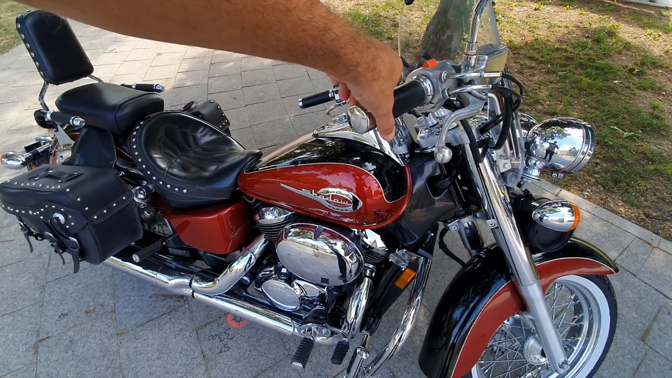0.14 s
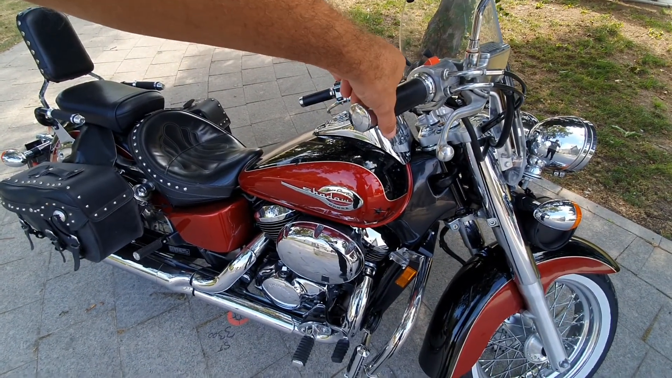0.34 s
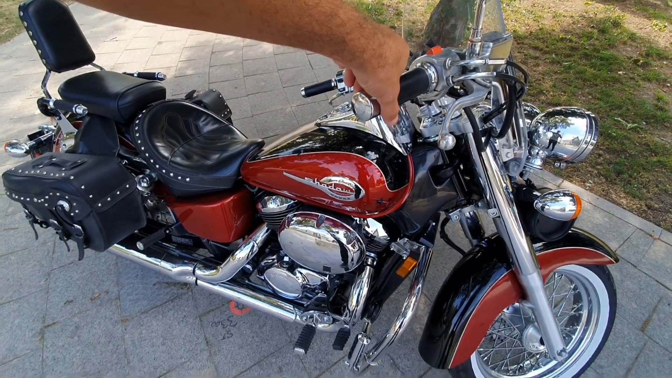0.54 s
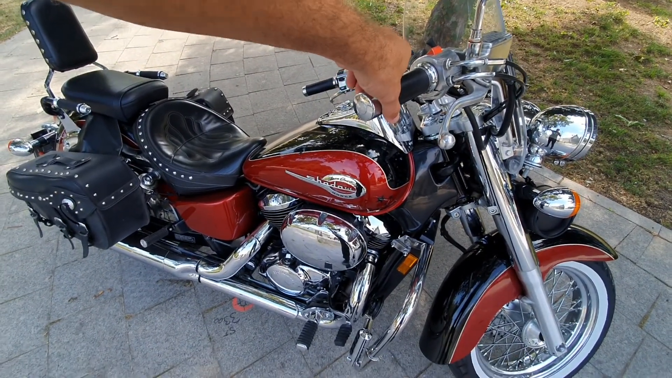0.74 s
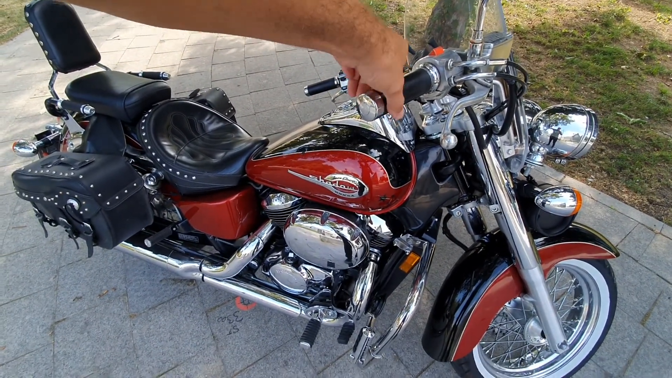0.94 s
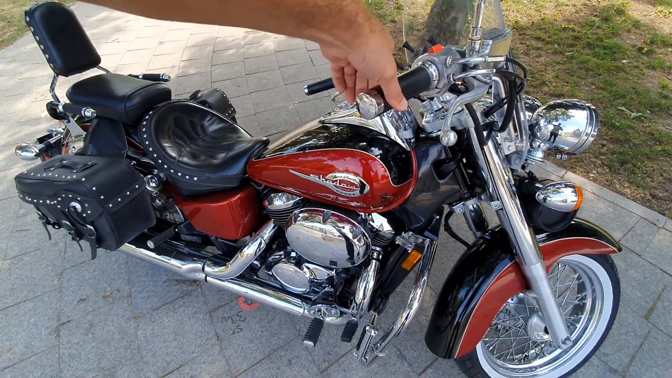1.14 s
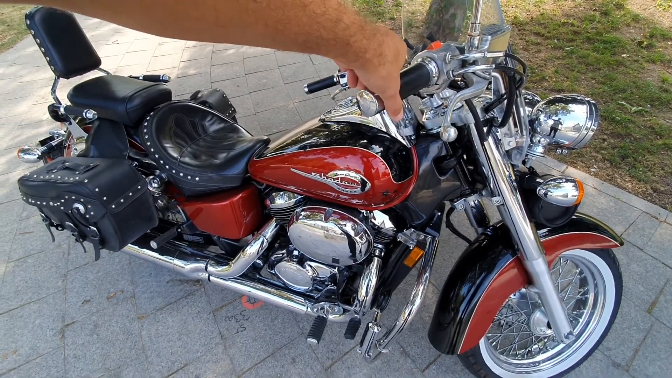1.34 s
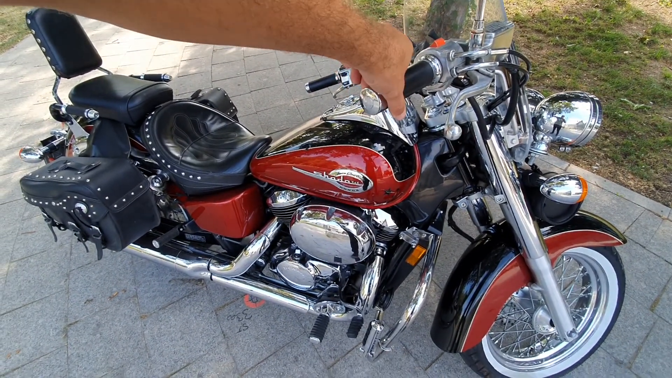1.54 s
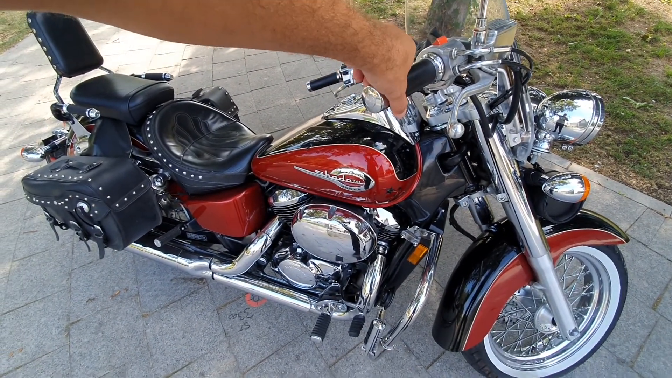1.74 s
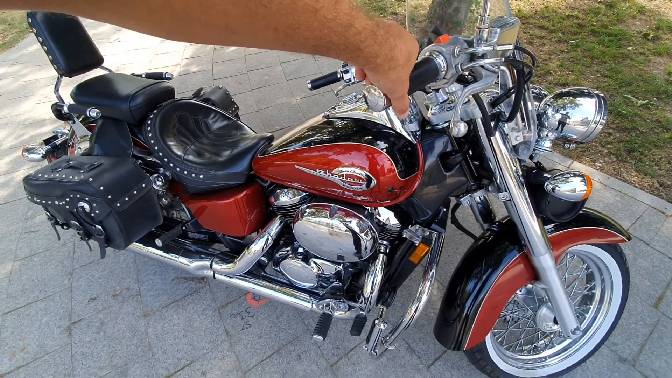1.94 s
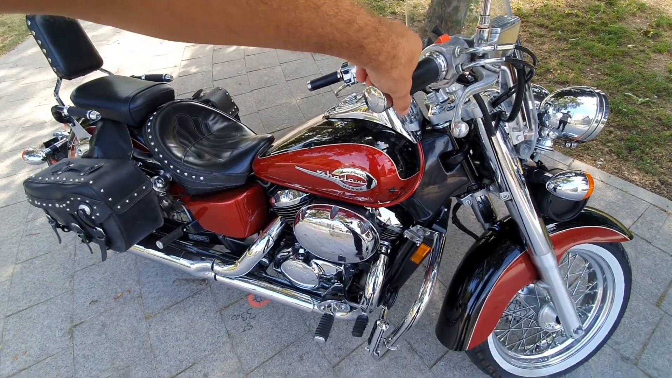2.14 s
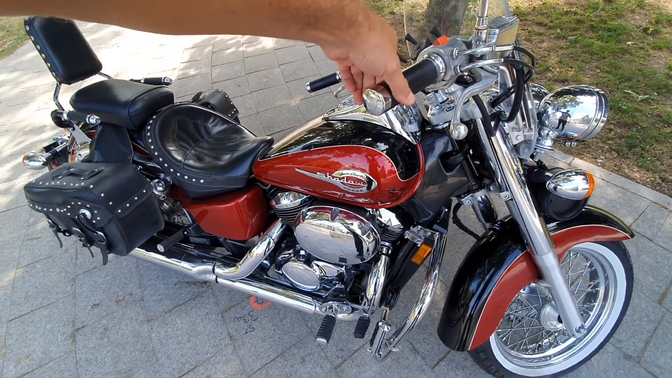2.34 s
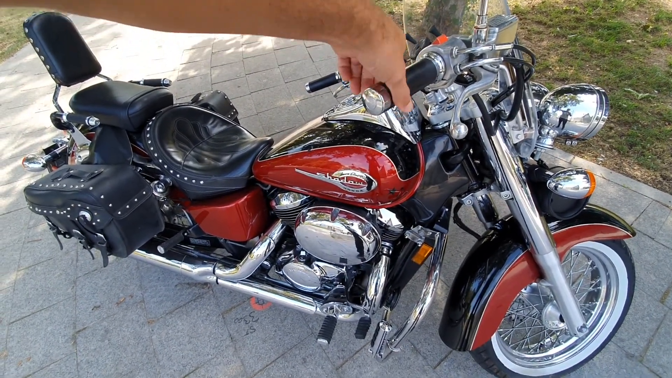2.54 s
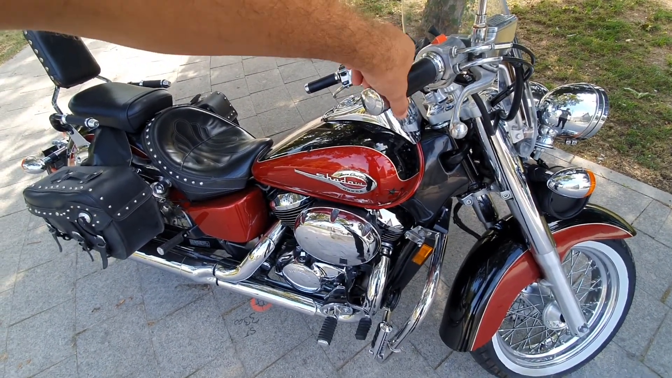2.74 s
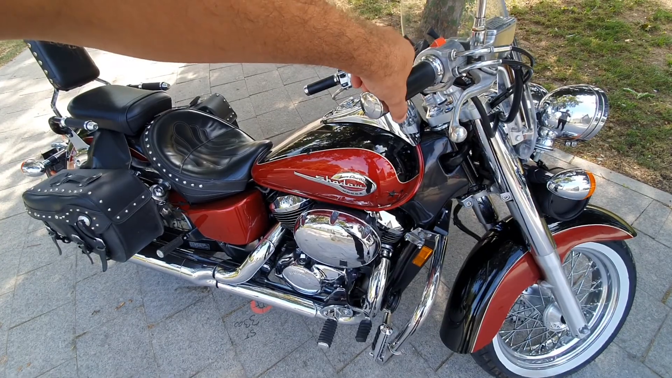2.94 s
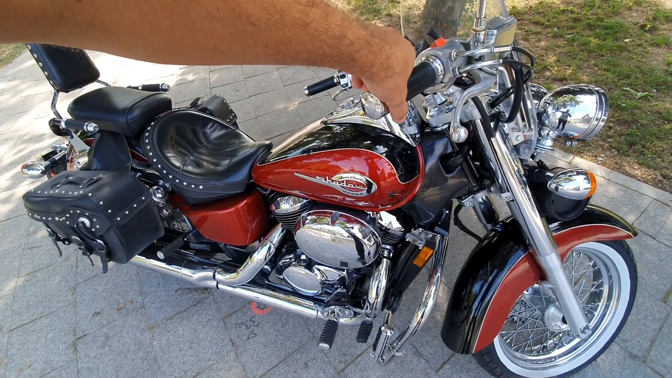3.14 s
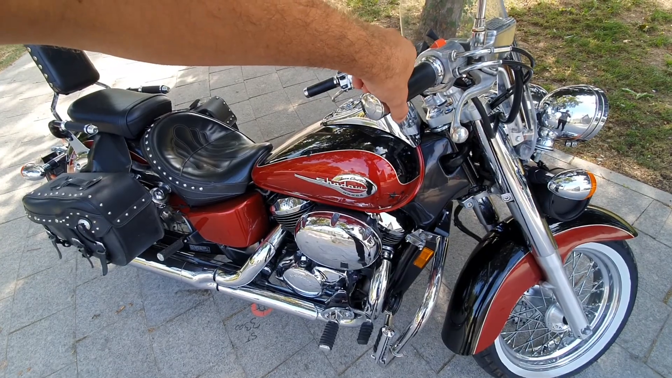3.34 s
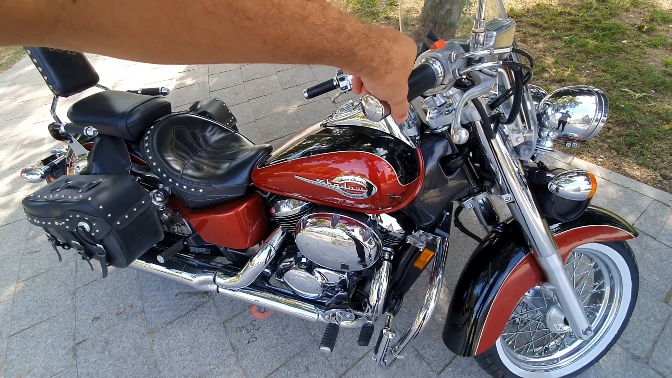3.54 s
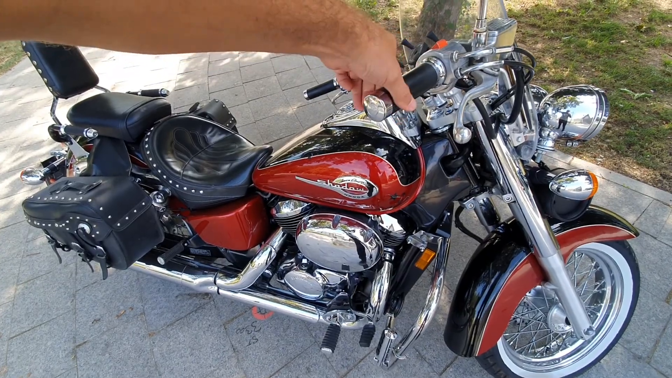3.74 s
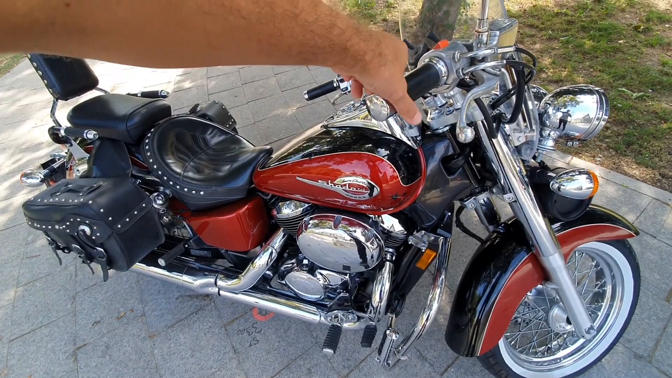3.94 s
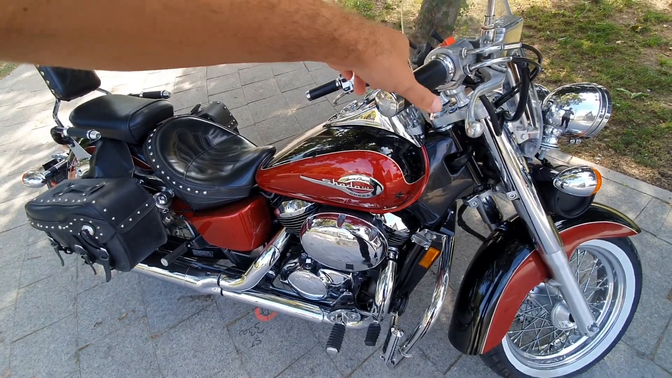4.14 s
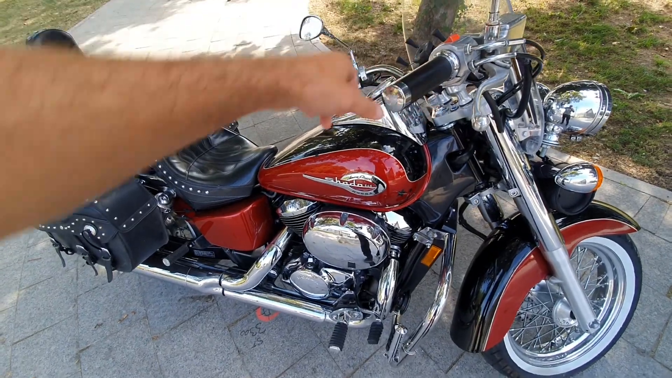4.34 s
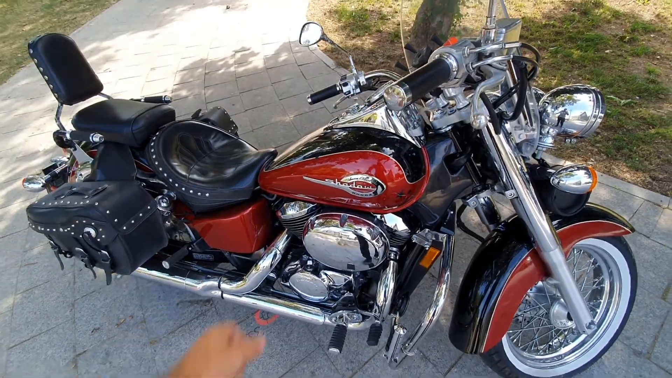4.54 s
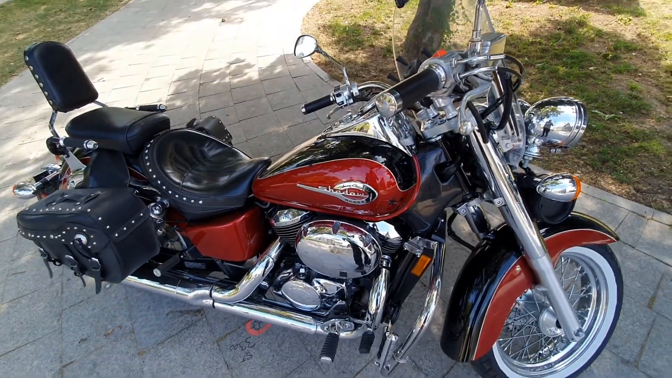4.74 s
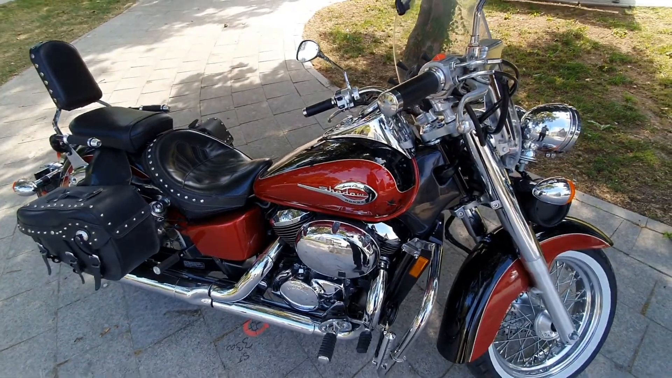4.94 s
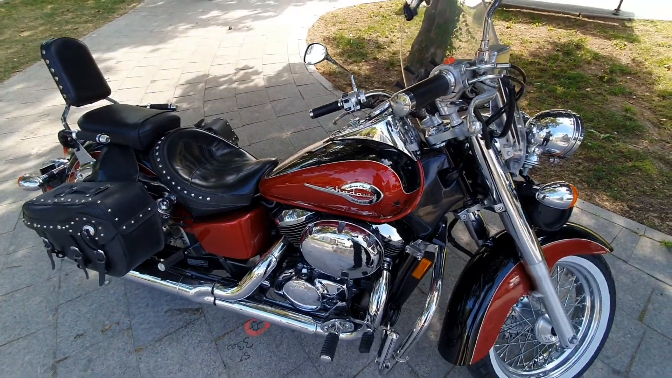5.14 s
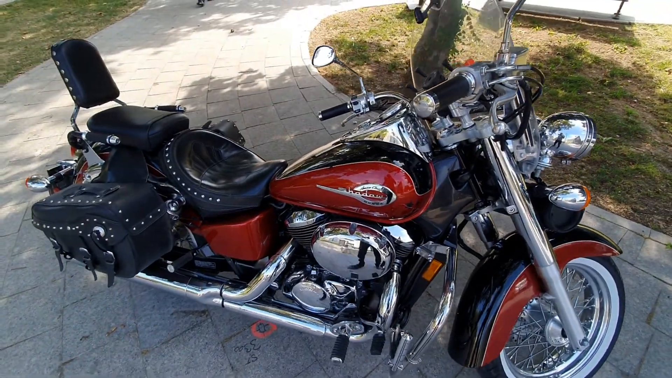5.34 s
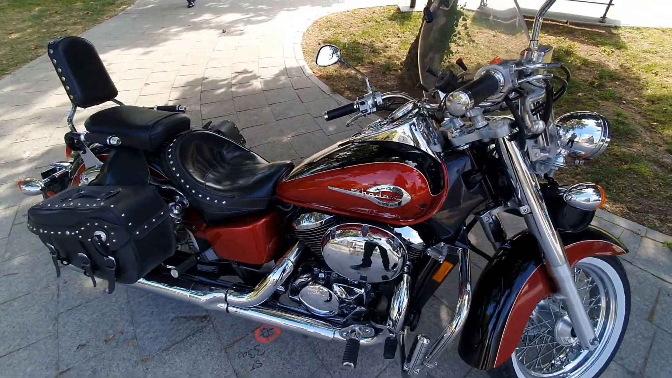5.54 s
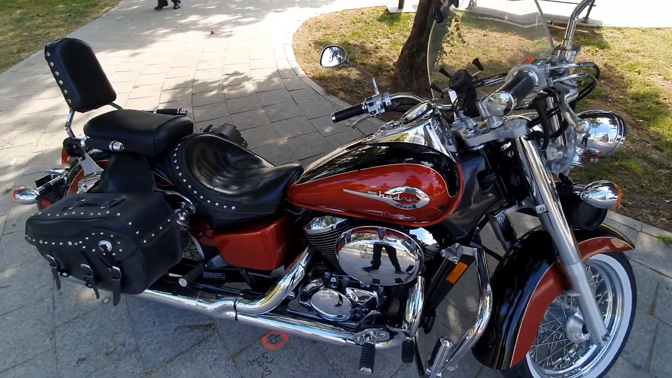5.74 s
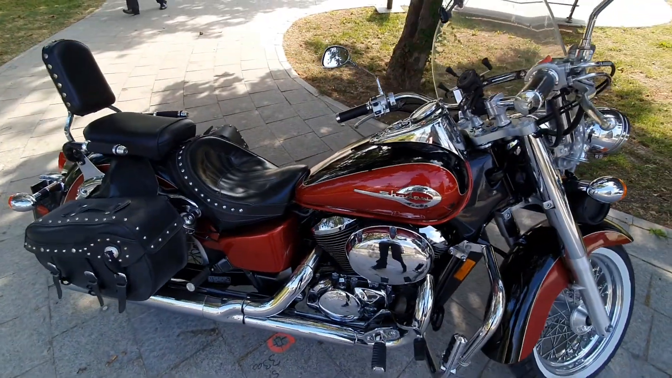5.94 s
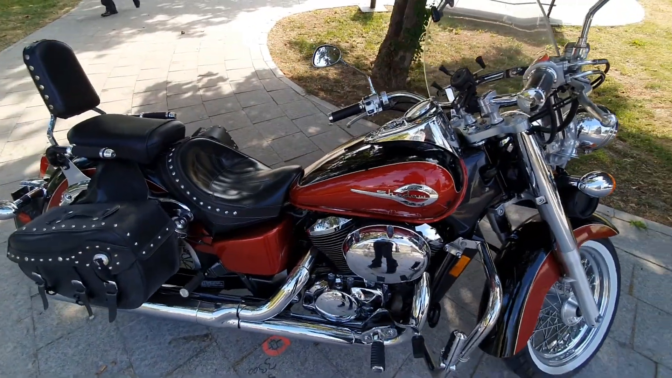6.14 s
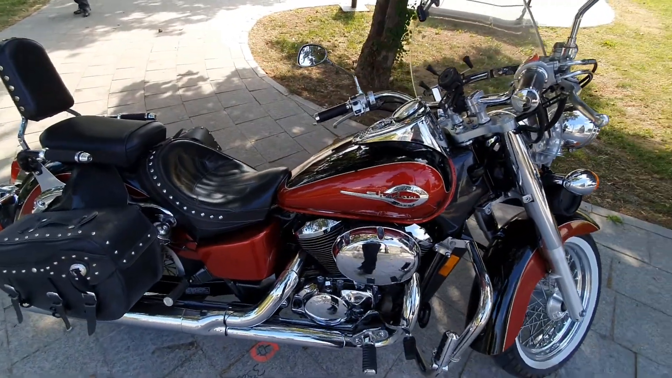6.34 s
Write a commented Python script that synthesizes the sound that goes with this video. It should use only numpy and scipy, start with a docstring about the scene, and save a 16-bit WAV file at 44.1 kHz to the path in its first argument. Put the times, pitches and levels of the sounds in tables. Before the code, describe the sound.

A V-twin motorcycle is heard close by in stereo, outdoors with only faint background air noise. At the start its revs are already falling from a blip, reaching a slow, lopsided idle by about 0.3 seconds: paired deep exhaust thumps, some weak or missed, over ticking rockers, pinging valves and rattling cam chains. At about 0.9 seconds the throttle snaps open with a breathy snort; the engine climbs fast, the exhaust barks, peaking near 1.2, then it coasts down with a thin falling whistle. Similar blips begin near 2.3 and 3.6 seconds, peaking around 2.55 and 3.85, the second reaching the highest revs. Small stray exhaust cracks appear between them. From about 4.5 seconds it idles unevenly again. After 5.1 seconds the idle grows louder as the microphone moves nearer, with fuller thumps, rumble and hiss strongest around 6.1, continuing to the end near 6.5.

```python
"""A V-twin motorcycle on open paving coasts down from a blip to a lopsided idle, heard close by in stereo.
Three more blips follow: the opening throttle snorts and the exhaust barks, then the shut throttle whistles
as the engine coasts back. Last, the idle grows louder as the microphones move nearer.
Throughout, each firing sends a pulse and turbulent gas through its pipe, some firings are weak,
and valve gear, valves and cam chains clatter over faint outdoor noise. Speed and throttle set the levels."""
import sys
import numpy as np
from scipy import signal
from scipy.fft import rfft, irfft, next_fast_len
from scipy.io import wavfile
from scipy.ndimage import uniform_filter1d, map_coordinates

SR = 44100
rng = np.random.default_rng(int(sys.argv[2]) if len(sys.argv) > 2 else 0)


def bounce(signal):
    """Save signal as a 16-bit WAV file at the path given by the first command-line argument."""
    frames = np.transpose(np.atleast_2d(signal))
    limited = np.clip(frames, -1, 1)
    pcm = np.round(limited * 32767).astype(np.int16)
    wavfile.write(sys.argv[1], SR, pcm)


N = 285752


def amp(db):
    """Decibels to gain."""
    return 10 ** (np.asarray(db) / 20)


def unit(x):
    """Scale to rms 1."""
    return x / np.sqrt(np.mean(x ** 2) + 1e-20)


def along(points, hz):
    """Interpolate (freq_hz, value) points on a log frequency axis."""
    freq_hz, value = np.transpose(points)
    return np.interp(np.log(hz + 1), np.log(freq_hz + 1), value)


def curves(rows):
    """One value per sample for each column after the time."""
    time_s, *columns = np.transpose(rows)
    return [np.interp(np.arange(N) / SR, time_s, column) for column in columns]


def filtered(x, response):
    """Multiply the spectrum of x by a complex response(hz)."""
    size = next_fast_len(N + SR // 2)
    spectrum = rfft(x, size) * response(np.fft.rfftfreq(size, 1 / SR))
    return irfft(spectrum, size)[..., :N]


def noise(spectrum, gate):
    """Gated noise of rms 1 in a given colour; rows are direct and scattered sound."""
    return unit(filtered(gate * rng.standard_normal((2, N)), lambda hz: amp(along(spectrum, hz))))


def pulse(level_db, size=16384):
    """Minimum-phase pulse whose spectrum is level_db(hz), made by folding the cepstrum."""
    cepstrum = irfft(np.log(amp(level_db(np.fft.rfftfreq(size, 1 / SR))) + 1e-6))
    cepstrum[1:size // 2] *= 2
    cepstrum[size // 2 + 1:] = 0
    return irfft(np.exp(rfft(cepstrum)))[:size // 2]


def impulses(times_s, sizes):
    """A train of single-sample kicks."""
    at = np.clip(np.round(times_s * SR).astype(int), 0, N)
    return np.bincount(at, sizes, N + 1)[:N]


def levelled(x, floor):
    """Divide out the slow rms, so the slow level is about 1."""
    return x / np.sqrt(np.abs(uniform_filter1d(x ** 2, SR // 7)) + floor)


def bursts(times_s, sizes, rise_s, decay_s, steady):
    """Envelope that jumps at each time and dies away over a steady part; slow level about 1."""
    t = np.arange(SR // 8) / SR
    shape = (1 - np.exp(-t / rise_s)) * np.exp(-t / decay_s)
    gate = signal.fftconvolve(impulses(times_s, sizes), shape / shape.max())[:N] + steady
    return levelled(gate, 1e-6)


def wobble(knots_per_s):
    """A smooth random curve."""
    return map_coordinates(rng.standard_normal(256), [np.arange(N) * knots_per_s / SR])


# hunting idle: time_s, speed_rpm
IDLE_SPEED = [(0, 989), (.33, 826), (.45, 869), (.65, 864), (.8, 927), (.95, 868), (1.9, 844), (2.05, 755),
              (2.25, 879), (3.3, 843), (3.6, 810), (4.55, 834), (4.85, 840), (5.2, 900), (5.5, 864),
              (5.95, 848), (6.4, 934)]
# throttle blips: start_s, held_s, gained_rpm, coast_s, hesitation_s (before the load comes), extra_load_db
THROTTLE_BLIPS = [(-.7, .28, 1440, .43, .02, 0), (.9195, .2946, 1917, .423, .036, 1.5),
                  (2.2778, .274, 2322, .49, .012, -.8), (3.6267, .2277, 2162, .4685, .02, 0)]
CLIMB_POWER, COAST_POWER = 1.217, 1.9


def speed():
    """Crankshaft rpm: each blip climbs while the throttle is open, then coasts back to idle."""
    t = np.arange(N) / SR
    rpm, = curves(IDLE_SPEED)
    for start_s, held_s, gained_rpm, coast_s, *_ in THROTTLE_BLIPS:
        climb = np.clip((t - start_s) / held_s, 0, 1) ** CLIMB_POWER
        coasting_s = np.maximum(t - start_s - held_s, 0)
        rpm = rpm + gained_rpm * climb * np.exp(-(coasting_s / coast_s) ** COAST_POWER)
    return rpm


OPENING_S, SHUTTING_S = .04, .06  # load taken up and dropped
CREST_LAG_S, CREST_WIDTH_S = 0.019, 0.064  # crest follows the throttle's release


def crank(rpm):
    """Four-stroke cycles completed, throttle opening 0-1, crest of each blip and its extra load in dB."""
    t = np.arange(N) / SR
    cycles = np.cumsum(rpm) / (120 * SR) + .27  # two turns a cycle
    throttle = crest = extra_db = 0
    for start_s, held_s, _, _, hesitation_s, load_db in THROTTLE_BLIPS:
        since_release_s = t - start_s - held_s
        opening = (t - start_s - hesitation_s) / OPENING_S
        shutting = 1 - since_release_s / SHUTTING_S
        opened = np.clip(np.minimum(opening, shutting), 0, 1)
        throttle = throttle + opened
        extra_db = extra_db + load_db * opened
        crest = crest + np.exp(-((since_release_s - CREST_LAG_S) / CREST_WIDTH_S) ** 2)
    return cycles, throttle, crest, extra_db


def passes(cycles, angle):
    """Times in s at which the engine passes an angle, in cycles."""
    turns = np.arange(np.ceil(cycles[0] - angle), cycles[-1] - angle) + angle
    return np.interp(turns, cycles, np.arange(N) / SR)


# approach of the microphones to the exhaust: time_s, nearness (0-1)
APPROACH = [(5.05, 0), (5.4, 0.27), (5.7, 0.77), (6.15, 0.91), (6.48, 0.83)]
# layer levels before each source's own trim: idle_db, coast_db (at speed), open_db (throttle open),
# crest_db (added at the crest), near_db (added at nearness 1)
LAYER_LEVELS = { "front thump": (-21, -6.5, -4.5, -12.5, 11.5), "rear thump": (-19, -5.5, -2, -3, 9.5),
                "front bark": (-54, -34.5, -21, -28, -10), "rear bark": (-51.5, -37.5, -15.5, -5, -3),
                "rumble": (-45, -28, -27, 8.5, 12.5), "whirr": (-53, -39.5, -35, -3, 13.5),
                "clatter": (-54, -40.5, -36, 0.5, 4.5), "hiss": (-51.5, -38, -31, -1.5, 18.5),
                "valves": (-58.5, -47, -33.5, -8.5, 11.5), "chains": (-59, -44.5, -39, 3, 13.5)}
SLOW_RPM, FULL_RPM = 863, 2780  # levels follow log speed between these
LUG_DB = 8.5  # under throttle, SLOW_RPM is this much quieter than FULL_RPM
WANDER_DB, WANDER_PER_S = 0.8, 9  # each layer's own random drift


def levels(rpm, throttle, crest, extra_db):
    """dB of each layer: follows speed, goes to the loaded level under throttle, shifts with nearness."""
    revs = np.clip(np.log(rpm / SLOW_RPM) / np.log(FULL_RPM / SLOW_RPM), 0, 1)
    near, = curves(APPROACH)
    db = {}
    for name, (idle_db, coast_db, open_db, crest_db, near_db) in LAYER_LEVELS.items():
        shut = idle_db + (coast_db - idle_db) * revs
        loaded = open_db + extra_db - LUG_DB * (1 - revs)
        engine = shut + throttle * (loaded - shut) + crest * crest_db
        db[name] = engine + near * near_db + WANDER_DB * wobble(WANDER_PER_S)
    return db


# uneven firings: time_s, loss_db (negative is stronger)
FIRING_LOSSES = [(.197, 10), (.59, 22), (1.251, 7), (1.269, 5.5), (1.919, 15), (2.629, 7), (3.162, 8),
                 (3.921, -3), (4.421, 6), (4.563, 10), (5.09, 19)]


def fired(times_s):
    """Gain of each firing: a misfire is weaker."""
    time_s, loss_db = np.transpose(FIRING_LOSSES)
    matched = np.abs(times_s[:, None] - time_s) < .008
    return amp(-(matched @ loss_db))


# relative pulse spectrum of each exhaust pipe: freq_hz, level_db
FRONT_PIPE = [(15, -54), (33, -11), (42, -36.5), (52, 2), (66, 4.5), (83, 4.5), (103, -4.5), (130, -16.5),
              (170, -20.5), (250, -27), (400, -31.5), (700, -57.5), (2000, -71.5)]
REAR_PIPE = [(15, -59.5), (33, -9), (45, -4.5), (58, 4.5), (75, -0.5), (97, 1), (125, -6), (160, -19.5),
             (230, -23), (320, -33.5), (450, -26), (700, -44), (2000, -92.5)]
# brightening of a pulse at open throttle: freq_hz, change_db
OPEN_TINT = [(60, -5.5), (100, 3), (150, 7.5), (280, 11), (500, -2.5), (1000, 22.5), (2500, 18.5)]
# change of a pulse at high speed, throttle shut, where blow-down is shorter: freq_hz, change_db
FAST_TINT = [(40, -5), (60, -4.5), (85, 0), (120, 3), (165, 7), (250, 2.5), (400, 4.5), (1000, -1)]


def cylinder(times_s, push_db, rpm, throttle, pipe, lead_s, scatter_db):
    """Blow-down pulses through one pipe; speed shortens them and an open throttle sharpens them."""
    at = (times_s * SR).astype(int)
    sizes = fired(times_s) * amp(push_db[at] + scatter_db * rng.standard_normal(len(at)))
    hot = throttle[at]
    fast = (1 - hot) * np.clip((rpm[at] - 1300) / 1200, 0, 1)
    soft_pulse = pulse(lambda hz: along(pipe, hz))
    hot_pulse = pulse(lambda hz: along(pipe, hz) + along(OPEN_TINT, hz))
    fast_pulse = pulse(lambda hz: along(pipe, hz) + along(FAST_TINT, hz))
    thump = 0
    for shape, share in ((soft_pulse, 1 - hot - fast), (hot_pulse, hot), (fast_pulse, fast)):
        thump = thump + signal.fftconvolve(impulses(times_s - lead_s, sizes * share), shape)[:N]
    return -thump / np.abs(soft_pulse).max()


# stray cracks in the pipe, throttle shut: time_s, kick_db
STRAY_POPS = [(0.0628, -44), (1.6189, -45), (2.2556, -52), (4.513, -46)]
# bark and pop colour: freq_hz, level_db
CRACK_COLOUR = [(350, -0.5), (600, 0.5), (697, -45), (811, 2.5), (996, 4.5), (1500, -10), (1720, -19),
                (2230, -8), (2820, -20.5), (3320, 2.5), (3860, -7.5), (5360, -5), (7650, -14.5),
                (12000, -17.5), (15800, -22)]
BARK_LEAD_S = 0.0025  # ahead of the firing time


def barks(pipes, levels_db):
    """Hard firings and stray pops tear out of the pipe: noise with a fast rise and two decays."""
    t = np.arange(SR // 12) / SR
    shape = (1 - np.exp(-t / 0.0014)) * (np.exp(-t / 0.0074) + .12 * np.exp(-t / 0.011))
    time_s, kick_db = np.transpose(STRAY_POPS)
    kicks = impulses(time_s, amp(kick_db))
    for times_s, bark_db in zip(pipes, levels_db):
        sizes = fired(times_s) * amp(bark_db[(times_s * SR).astype(int)])
        kicks = kicks + impulses(times_s - BARK_LEAD_S, sizes)
    return signal.fftconvolve(kicks, shape / shape.max())[:N] * noise(CRACK_COLOUR, 1)


def ringing(pipes, spectrum, decay_s):
    """Each pipe answers all its firings with the same dense echoes, so overtones follow the speed."""
    t = np.arange(SR // 10) / SR
    echoes = np.exp(-t / decay_s) * rng.standard_normal((2, 2, len(t)))
    ring = 0
    for times_s, echo in zip(pipes, echoes):
        kicks = impulses(times_s - .0015, fired(times_s))
        ring = ring + signal.fftconvolve(kicks[None], echo, axes=1)[:, :N]
    ring = unit(filtered(ring, lambda hz: amp(along(spectrum, hz))))
    return levelled(ring, 1e-3)


# gas colours, rumble and hiss: freq_hz, level_db
RUMBLE_COLOUR = [(88, -38), (150, 3), (323, -7.5), (367, -5.5), (450, -18), (521, -31.5), (569, -12.5),
                 (651, -34), (750, -66), (980, -52), (1650, -120)]
HISS_COLOUR = [(1530, -74), (2600, -2), (2800, 2.5), (3360, 4.5), (3680, -1.5), (4180, -12), (5330, -5),
               (5740, -26), (6630, -3), (7650, -27), (8770, -5.5), (10200, -14.5), (12600, -10.5),
               (15000, -28), (15800, -57)]
# colour of the gas rasp and the gear whirr: freq_hz, level_db
WHIRR_COLOUR = [(350, -52), (600, -1), (701, -3), (907, -1.5), (983, 1), (1110, 1.5), (1260, -2),
                (1550, -0.5), (1770, -10.5), (2000, -6), (2600, -52), (4400, -120)]


def gas(pipes, rpm, rumble_db, whirr_db, hiss_db):
    """Each firing rings the silencer; its turbulence rumbles inside and hisses at the mouth."""
    firings_s = np.concatenate(pipes)
    sizes = fired(firings_s) * amp(2 * rng.standard_normal(len(firings_s)))
    rumble_gate = bursts(firings_s - .0015, sizes, rise_s=.001, decay_s=.018, steady=.18)
    rumble = amp(-3.5) * noise(RUMBLE_COLOUR, rumble_gate) + ringing(pipes, RUMBLE_COLOUR, decay_s=0.013)
    hiss_gate = bursts(firings_s - .003, sizes, rise_s=.0015, decay_s=.008, steady=.35)
    hiss = amp(hiss_db - 4.5) * noise(HISS_COLOUR, hiss_gate)
    rasp = amp(whirr_db - 2.5) * ringing(pipes, WHIRR_COLOUR, decay_s=.0055)
    flow = np.clip((rpm - 720) / 1150, .18, 1)  # jet strengthens with speed
    return amp(rumble_db) * rumble + flow * (hiss + rasp)


# rocker tick colour: freq_hz, level_db
CLATTER_COLOUR = [(760, -26), (1300, 9.5), (1410, -27), (1660, -4), (1740, 6), (2000, 8), (2160, 11.5),
                  (2320, 9), (2730, 2.5), (3160, 2.5), (3500, -1.5), (4110, -4), (5390, -13), (6430, 0),
                  (7500, -55), (9750, -75), (16500, -120)]
# ringing of the engine cases and fins: freq_hz, width_hz, level_db
CASE_MODES = [(428.6, 24.3, 16), (590, 83, -1), (786, 42, -2.5), (1185, 57, -0.5), (1456, 20, -14),
              (1990, 7.7, 8), (2254, 13, 11), (2497, 29, 3), (3500, 13, -1), (4420, 200, -28.5),
              (6900, 120, -13.5)]


def case_response(hz):
    """Sum of resonant modes of alternating sign."""
    response = 0
    for k, (freq_hz, width_hz, level_db) in enumerate(CASE_MODES):
        damping = 1j * hz * width_hz
        response = response + (-1) ** k * amp(level_db) * damping / (freq_hz ** 2 - hz ** 2 + damping)
    return response


def valve_gear(cycles, whirr_db, clatter_db, count=8):
    """Rockers tick with the shaft, count times a cycle, and ring the cases; the gears whirr."""
    ticks_s = np.concatenate([passes(cycles, k / count) for k in range(count)])
    late, size = rng.standard_normal((len(ticks_s), 2)).T
    gate = bursts(ticks_s + 0.0032 * late, amp(2 * size), rise_s=0.00031, decay_s=0.017, steady=0.29)
    ring = amp(clatter_db + 2.5) * unit(filtered(gate * rng.standard_normal((2, N)), case_response))
    whirr = amp(whirr_db - 3.0) * noise(WHIRR_COLOUR, gate)
    clatter = amp(clatter_db - 4.0) * noise(CLATTER_COLOUR, gate)
    return amp(0.95) * (clatter + ring + whirr)


# ping modes of the closing valves: freq_hz, level_db
VALVE_MODES = [(3370, -2), (4130, 0.5), (4450, -0.5), (5200, -2.5), (6520, -2)]


def valves(firings_s, level_db):
    """A valve snaps shut near each firing and pings with a new mix of its modes."""
    t = np.arange(SR // 10) / SR
    chance = rng.standard_normal((len(firings_s), 2 * len(VALVE_MODES)))
    pings = 0
    for (freq_hz, mode_db), size, late in zip(VALVE_MODES, chance.T[::2], chance.T[1::2]):
        ring = amp(mode_db - 60 * t / 0.088) * np.sin(2 * np.pi * freq_hz * t)  # -60 dB in 88 ms
        kicks = impulses(firings_s + .0012 * late, amp(4.5 * np.clip(size, -2, 2)))
        pings += signal.fftconvolve(kicks, ring)[:N]
    return amp(level_db) * pings


# cam chain rattle colour: freq_hz, level_db
CHAIN_COLOUR = [(2400, -28), (3300, -4), (4300, -2), (5300, -7.5), (6700, -8), (7600, -19), (15000, -24)]


def chains(cycles, level_db, count=6):
    """The cam chains slap unevenly, count times a cycle."""
    slaps_s = np.concatenate([passes(cycles, k / count) for k in range(count)])
    late, size = rng.standard_normal((len(slaps_s), 2)).T
    sizes = amp(4.5 * np.clip(size, -2, 2))
    gate = bursts(slaps_s + .004 * late, sizes, rise_s=.0003, decay_s=.01, steady=.5)
    return amp(level_db) * noise(CHAIN_COLOUR, gate)


# intake snorts as the throttle snaps open: time_s, kick_db
SNORT_KICKS = [(0.9572, -39), (1.0116, -29.5), (2.3007, -33.5), (3.657, -35), (3.712, -43)]
# snort colour: freq_hz, level_db
SNORT_COLOUR = [(300, -14), (700, -23), (1600, 3), (2250, 11), (2900, -8), (6000, -44), (9000, -42),
                (15000, -38)]


def snorts():
    """The first gulps through the opened throttle: short noise bursts."""
    t = np.arange(SR // 12) / SR
    shape = (1 - np.exp(-t / .001)) * np.exp(-t / 0.022)
    time_s, kick_db = np.transpose(SNORT_KICKS)
    return signal.fftconvolve(impulses(time_s, amp(kick_db)), shape)[:N] * noise(SNORT_COLOUR, 1)


WHISTLE_LAG_S, WHISTLE_S, WHISTLE_DB = .11, .07, -37.5  # lag from release to loudest
WHISTLE_HZ, WHISTLE_WIDTH_HZ, WHISTLE_SAG_HZ_PER_S = 2030, 61, 1070  # pitch when loudest


def whistle():
    """The racing engine sucks air past the shut throttle: narrow noise on a falling carrier."""
    t = np.arange(N) / SR
    lowpass = lambda hz: 1 / (1 + (hz / WHISTLE_WIDTH_HZ) ** 2)
    flutter = unit(filtered(rng.standard_normal((2, N)), lowpass))
    quadrature = flutter[::-1] * [[1], [-1]]
    sound = 0
    for start_s, held_s, *_ in THROTTLE_BLIPS:
        u = t - start_s - held_s - WHISTLE_LAG_S
        phase = 2 * np.pi * (WHISTLE_HZ * u - WHISTLE_SAG_HZ_PER_S * u ** 2 / 2)
        tone = flutter * np.cos(phase) + quadrature * np.sin(phase)
        sound = sound + np.exp(-(u / WHISTLE_S) ** 2) * tone
    return amp(WHISTLE_DB) * sound


# intake hum colour: freq_hz, level_db
INTAKE_COLOUR = [(1500, -50), (1900, -20), (2060, 20), (2250, 8), (2450, 3), (3000, -3)]


def intake(cycles, rpm):
    """Gulps of air, two a cycle, hum in the intake; level grows with speed cubed."""
    gulps = 1 + 0.26 * np.cos(4 * np.pi * cycles)
    return amp(-47) * (rpm / 3000) ** 3 * noise(INTAKE_COLOUR, gulps)


# open-air background colour: freq_hz, level_db
AIR_COLOUR = [(30, -17), (100, 11), (400, -10), (700, -23.5), (2000, -19), (6700, -33.5), (7600, -36),
              (15000, -37)]


def open_air():
    """Steady faint noise of the open air."""
    return amp(-40.5) * noise(AIR_COLOUR, 1)


# stereo width of the two microphone ports: freq_hz, side_minus_mid_db
PORT_WIDTH = [(60, -21), (170, -14.5), (350, -11.5), (700, -3), (1400, .5), (2800, 1), (5600, 1),
              (11000, .2)]
# scattered part of the side: freq_hz, share (0-1)
SIDE_SCATTER = [(100, 0.07), (400, 0.77), (1000, 0.9), (3000, 0.87), (10000, 0.76)]
# level difference of the ports: freq_hz, left_minus_right_db
PORT_LEAN = [(60, 0.5), (350, 1), (1400, 1.5), (3000, 0), (6000, -.5), (14000, 0)]


def ports(direct, scattered):
    """Left and right ports: the side mixes direct sound a quarter cycle late with scattered sound."""
    share = lambda hz: np.clip(along(SIDE_SCATTER, hz), 0, 1)
    width = lambda hz: amp(along(PORT_WIDTH, hz))
    side = filtered(direct, lambda hz: -1j * width(hz) * np.sqrt(1 - share(hz) ** 2))
    side += filtered(scattered, lambda hz: width(hz) * share(hz))
    pair = np.array([direct - side, direct + side])
    return filtered(pair, lambda hz: amp(np.outer([.5, -.5], along(PORT_LEAN, hz))))


REAR_LAG_CYCLES = .41  # rear fires after front; uneven, hence the lopsided beat


def scene():
    """Two unevenly spaced cylinders, their gas noise, the valve gear and the open air."""
    rpm = speed()
    cycles, throttle, crest, extra_db = crank(rpm)
    db = levels(rpm, throttle, crest, extra_db)
    pipes = front, rear = passes(cycles, 0), passes(cycles, REAR_LAG_CYCLES)
    firings_s = np.concatenate(pipes)
    thump = cylinder(front, db["front thump"], rpm, throttle, FRONT_PIPE, lead_s=0.0026, scatter_db=1.5)
    thump += cylinder(rear, db["rear thump"], rpm, throttle, REAR_PIPE, lead_s=0.002345, scatter_db=0.97)
    rush = barks(pipes, (db["front bark"], db["rear bark"]))
    rush += gas(pipes, rpm, db["rumble"], db["whirr"], db["hiss"])
    rush += valve_gear(cycles, db["whirr"], db["clatter"]) + chains(cycles, db["chains"])
    rush += snorts() + whistle() + intake(cycles, rpm) + open_air()
    direct = thump + valves(firings_s, db["valves"]) + rush[0]
    scattered = valves(firings_s, db["valves"]) + rush[1]
    return ports(direct, scattered)


TOP_HZ = 15950


def record(dry):
    """Round off the highest peaks, then cut everything from TOP_HZ up."""
    rounded = dry / (1 + np.abs(dry / .97) ** 8) ** (1 / 8)
    return filtered(rounded, lambda hz: hz < TOP_HZ)


dry = scene()
out = record(dry)
bounce(out)
```